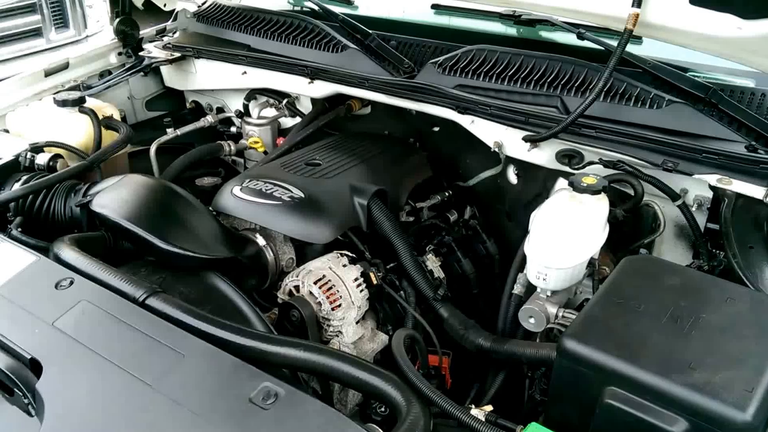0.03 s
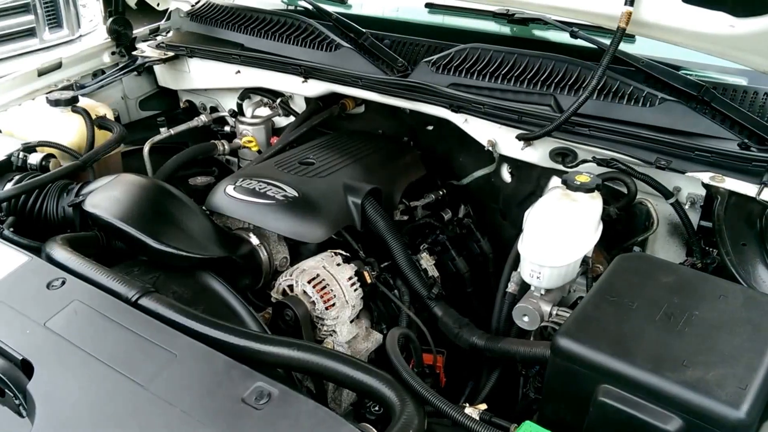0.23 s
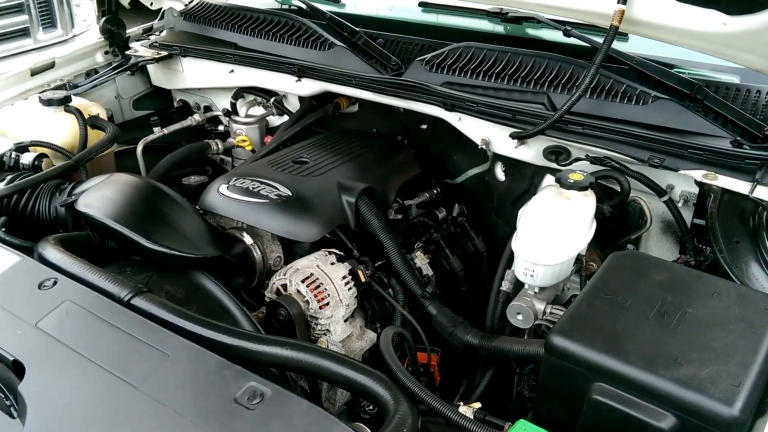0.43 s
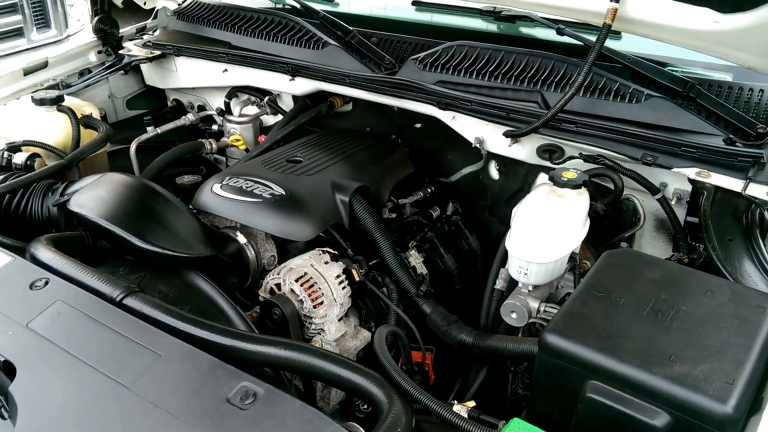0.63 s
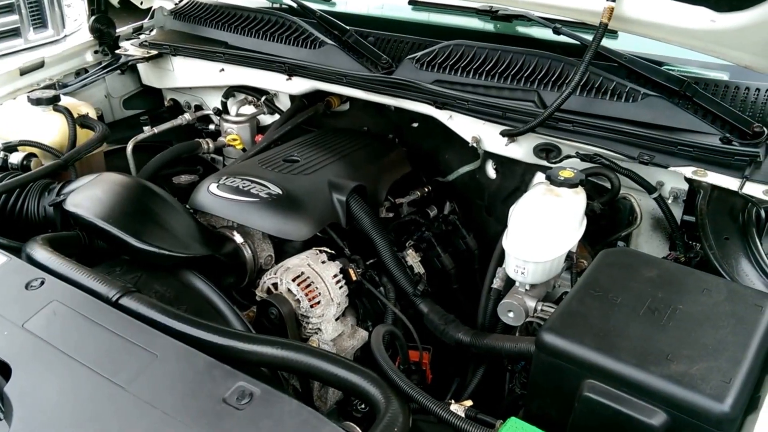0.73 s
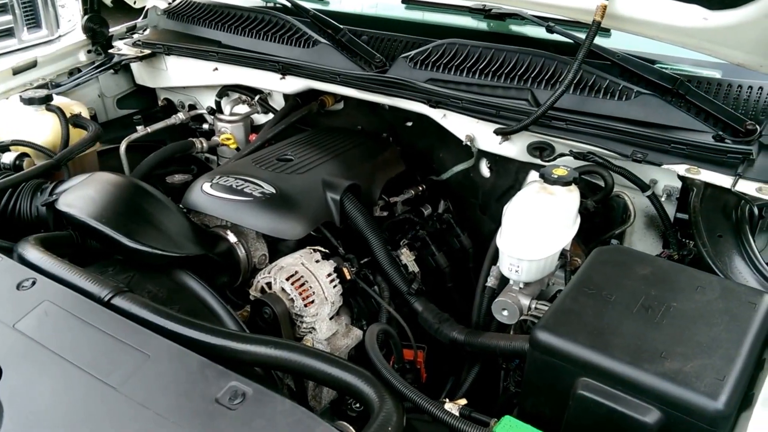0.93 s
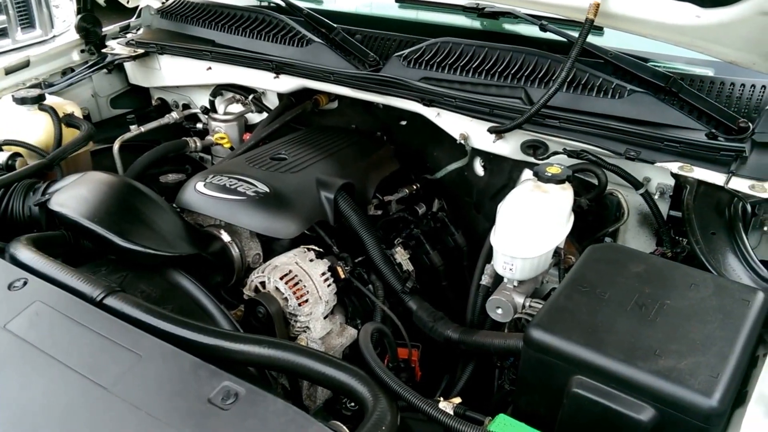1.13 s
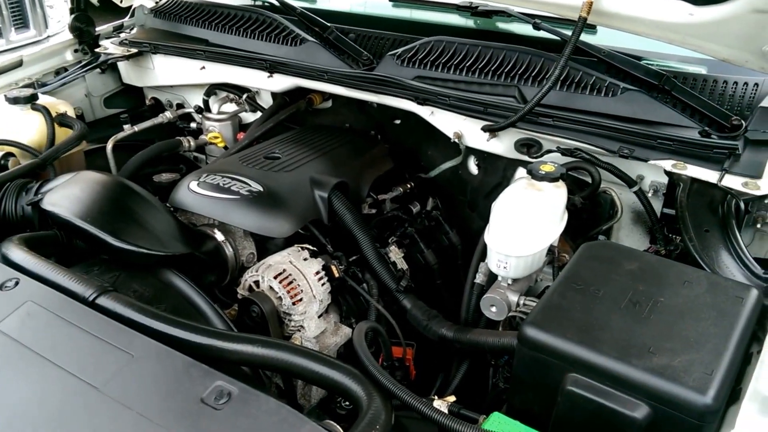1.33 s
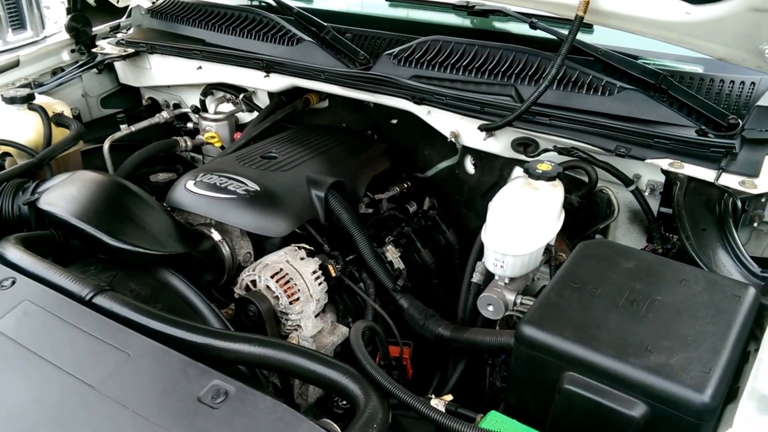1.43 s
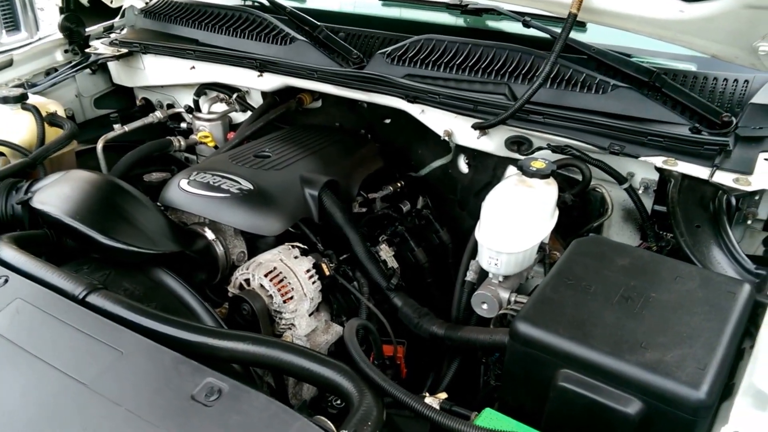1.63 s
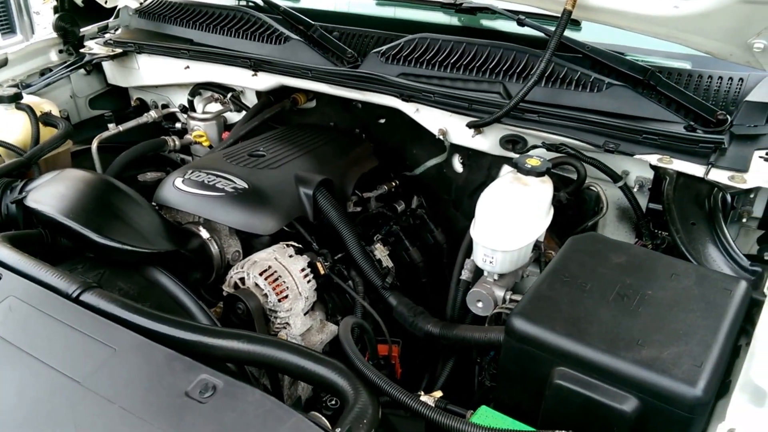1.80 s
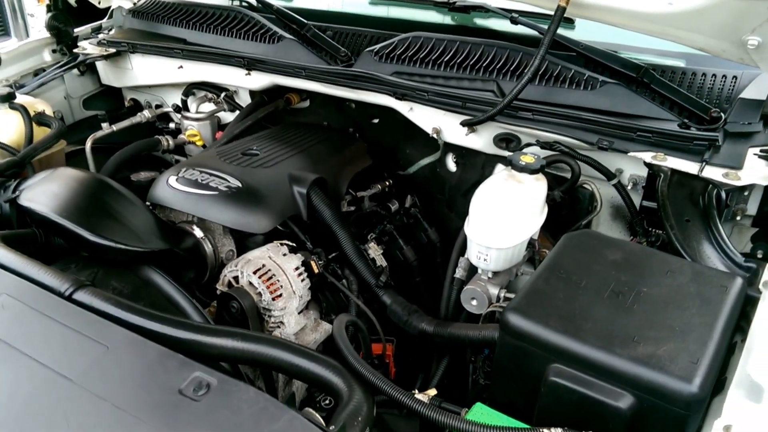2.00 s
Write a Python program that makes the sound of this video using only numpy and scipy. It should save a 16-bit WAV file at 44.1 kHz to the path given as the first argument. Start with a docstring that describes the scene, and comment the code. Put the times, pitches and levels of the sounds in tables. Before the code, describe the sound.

A large petrol engine idles, heard close from above the open bay in stereo. After a moment of silence it fades in by 0.4 s: uneven low throb, boomy fan and intake roar, rapid metallic valve ticking. A thin, wandering whistle comes and goes. Louder knocks stand out from 0.44 s; high belt chirps come near 0.5, 0.9 and 1.3 s. Around 1.6 s the idle sags, then partly recovers.

```python
"""A large petrol V8 idles, heard from above the open engine bay.
After a short silence it fades in: firing-order and fan-blade sines throb under bands of roar and boom noise,
while each firing strikes the ringing modes of the valve covers. A sine whistle, wandering in pitch, soon joins.
From 0.44 s louder knocks, bursts of resonant noise, stand out; from 0.5 s the drive belt chirps three times,
about once per lap, as friction noise in resonances. Near 1.6 s the idle sags, then partly recovers."""
import sys
import numpy as np
from scipy import signal
from scipy.fft import rfft, irfft
from scipy.io import wavfile

SR = 44100
rng = np.random.default_rng(int(sys.argv[2]) if len(sys.argv) > 2 else 0)


def generate_wav(signal):
    """Clip the signal to [-1, 1] and save it as 16-bit WAV at the path in sys.argv[1]."""
    frames = np.transpose(np.atleast_2d(signal))
    scaled = np.clip(frames, -1, 1) * 32767
    pcm = np.round(scaled).astype(np.int16)
    wavfile.write(sys.argv[1], SR, pcm)


N = 90934

# Engine speed. Each row: time in seconds, firing rate in Hz.
FIRING_RATE = [(0, 39.15), (.5, 39.48), (1.4, 39.2), (1.62, 37.48), (1.8, 37.94), (2.06, 38.6)]

# Firing orders. Each row: multiple of firing rate, level in dB re the exhaust note's base, start phase in turns.
FIRING_ORDERS = [(1, -6.5, 0.95), (2, -1.5, 0.75), (5, -7.5, 0.31)]
# Throb of the low notes. Each row: time in seconds, exhaust note base in dB rms, blade tone in dB rms.
LOW_NOTE_THROB = [(0.3, -41, -49), (0.362, -51, -37.5), (0.49, -38, -45.5), (0.618, -60, -39),
                  (0.652, -35, -52), (0.696, -57, -41.5), (0.746, -64, -52), (0.828, -38.5, -35.5),
                  (0.878, -39.5, -44), (0.926, -41, -60), (0.996, -50, -50), (1.034, -60, -35.5),
                  (1.128, -40, -49), (1.182, -46, -47), (1.236, -39, -34.5), (1.314, -37.5, -51),
                  (1.368, -49.5, -37.5), (1.402, -47, -54), (1.51, -37.5, -45), (1.564, -46, -57),
                  (1.598, -54, -43), (1.676, -40, -47), (1.79, -46.5, -47), (1.814, -47, -38.5),
                  (1.946, -37.5, -40), (2.014, -65, -45), (2.06, -55, -63)]
EXHAUST_ORDER, OTHER_ORDERS_THROB_SHARE = 2, .25
BLADES_PER_FIRING, BLADE_START_TURNS, BLADE_OCTAVE_DB = 2.79, 0.914, -14

# Air resonances of the bay. Each row: centre in Hz, width per pass in Hz, level in dB rms before balance.
BAY_RESONANCES = [(27, 8.7, -87), (60, 47, -55), (65.8, 14, -52), (102.8, 29, -49), (202.7, 34, -53.5),
                  (300.8, 30.3, -52), (438, 72, -52.5), (722.5, 135, -51), (1225, 93, -62.5),
                  (1660, 290, -51), (6350, 900, -55.5), (7950, 71, -68)]

# Fan and intake roar. Each row: frequency in Hz, relative spectral density in dB.
ROAR_SPECTRUM = [(74, -19.5), (125, -3), (156, -10), (298, -12), (350, -13), (474, -10.5), (592, -14),
                 (724, -18), (1060, -12), (1350, -13), (1660, -14.5), (3100, -17.5), (6290, -16),
                 (11300, -37), (15600, -34)]
ROAR_RMS_DB, ROAR_FLICKER_DB, ROAR_PULSE_DB, ROAR_PULSE_ABOVE_HZ = -36, 1.18, 1, 1500
# Left-right likeness of the noises. Each row: frequency in Hz, correlation from 0 to 1.
CHANNEL_LIKENESS = [(30, .6), (70, .75), (130, .9), (290, .96), (640, .88), (1100, .7), (1700, .3),
                    (3100, .1), (15000, .05)]
# Balance of the noises. Each row: frequency in Hz, left minus right in dB.
CHANNEL_BALANCE = [(100, -2.5), (450, 1.6), (740, 0), (1220, 5), (2010, 2), (3330, -3.5), (5500, 0.5),
                   (9080, 3), (15000, 2.5)]

# Tick strength by cylinder in firing order. Each entry: level in dB re TICK_DB.
CYLINDER_TICKS = [-2, 0, -3, -1, -3, -2, -4, -1]
# Ringing modes of the valve covers. Each row: frequency in Hz, level in dB, 60 dB decay time in seconds.
COVER_MODES = [(2200, -4, .025), (2750, -2, .03), (3350, -6, .025), (4000, -3, .025), (4750, -1, .03),
               (5300, -3, .025), (6200, -2, .02), (7900, -9, .025)]
TICK_START_S, TICK_DB, TICK_JITTER_S, TICK_SMEAR_S = .0093, -39.5, .0013, .002
TICK_SCATTER_DB, TICK_MODE_SCATTER_DB = 1, 3.5
CLATTER_PER_S, CLATTER_DB, CLATTER_SCATTER_DB = 210, -43, 3.5

# Intake whistle, one list per strand. Each row: time in seconds, pitch in Hz, level in dB rms.
WHISTLE_STRANDS = [
    [(.15, 1070, -39), (.28, 1140, -71), (.4, 1200, -55), (.56, 1215, -44)],
    [(.53, 1060, -53), (.61, 1090, -41), (.72, 1150, -64), (.85, 1225, -50), (.96, 1240, -52)],
    [(.95, 1140, -57), (1.15, 1190, -48.5), (1.3, 1150, -66), (1.45, 1130, -47), (1.62, 1095, -54)],
    [(1.61, 1045, -47), (1.69, 1100, -44), (1.75, 1140, -51), (1.84, 1155, -53), (1.92, 1125, -48),
     (2.02, 1118, -43.5)],
    [(2.01, 1070, -52), (2.09, 1050, -49)],
]
WHISTLE_LEFT_MINUS_RIGHT_DB, WHISTLE_EDGE_S = 3, 0.0067
WHISTLE_WAVER_DB, WHISTLE_WAVER_HZ = 0.5, 6

# Louder knocks. Each row: start in seconds, level in dB rms before the envelope, pitch in Hz.
LOUD_KNOCKS = [(0.441, -33, 2730), (0.65, -31.5, 2700), (0.679, -38, 4700), (.84, -33.5, 2850),
               (1.208, -39, 6240), (1.466, -33, 2800), (1.687, -34, 2400), (1.715, -34, 4850),
               (1.866, -33, 3750), (1.878, -37, 4240)]
KNOCK_RISE_S, KNOCK_T60_S, KNOCK_WIDTH_HZ = 0.0022, 0.048, 260

# Belt slips. Each row: centre in seconds, half length to 1/e in seconds, nominal level in dB, left minus right in dB.
BELT_CHIRPS = [(0.511, 0.019, -37.5, 2), (.916, .012, -28, -1.5), (1.318, 0.0062, -30.5, -2)]
# Resonances of the slipping belt. Each row: centre in Hz, width in Hz, relative gain in dB.
BELT_RESONANCES = [(5470, 230, -12), (5840, 410, -9), (6320, 132, 2), (6970, 280, -6.5), (7740, 560, -14)]
BELT_FLUTTER_DB = 2.7

# Lead of the left channel. Each row: frequency in Hz, phase in radians.
LEFT_LEAD = [(40, 0.1), (100, 0.073), (300, 0.28), (640, 0.55), (1120, 1.06), (1400, 2.77), (2300, 0.11)]
FADE_START_S, FADE_ZERO_S, FADE_END_S, FADE_CURVE = .078, 0.06, 0.37, 1.06
CUTOFF_HZ = 15750


def from_db(db):
    """Decibels to gain."""
    return 10 ** (np.asarray(db) / 20)


def rms_one(x):
    """Scale to unit rms."""
    return x / np.sqrt(np.mean(x ** 2) + 1e-20)


def in_time(rows):
    """Columns of a time table, interpolated to one value per sample."""
    times_s, *columns = np.transpose(rows)
    return [np.interp(np.arange(N) / SR, times_s, column) for column in columns]


def at_hz(points, hz):
    """Read a frequency table on a log frequency axis."""
    points = np.array(points)
    return np.interp(np.log(hz), np.log(points[:, 0]), points[:, 1])


def drift(rate_hz):
    """Slow random wander of unit spread: noise through two equal poles, at 1/40 of the sample rate."""
    step = 40
    r = np.exp(-2 * np.pi * rate_hz * step / SR)
    noise = rng.standard_normal(N // step + 2002)
    slow = signal.lfilter([1], [1, -2 * r, r * r], noise)[2000:]  # settled part
    return np.interp(np.arange(N) / step, np.arange(len(slow)), rms_one(slow - slow.mean()))


def resonate(x, hz, width_hz):
    """Two-pole resonance, gain 1 on top."""
    r = np.exp(-np.pi * width_hz / SR)
    zeros = np.array([1, 0, -1]) * (1 - r * r) / 2
    return signal.lfilter(zeros, [1, -2 * r * np.cos(2 * np.pi * hz / SR), r * r], x)


def stereo(mid, side, hz):
    """Mix two independent noises to the channel likeness and balance at hz."""
    alike = np.clip(at_hz(CHANNEL_LIKENESS, hz), 0, .98)
    signs = np.array([[1], [-1]])
    pair = np.sqrt((1 + alike) / 2) * mid + np.sqrt((1 - alike) / 2) * side * signs
    return pair * from_db(at_hz(CHANNEL_BALANCE, hz) / 2 * signs)


def tones(firings):
    """Firing orders and fan blade tone: sines locked to the firing count, throbbing in level."""
    note_db, blade_db = in_time(LOW_NOTE_THROB)
    calm_db = note_db.mean() + OTHER_ORDERS_THROB_SHARE * (note_db - note_db.mean())
    orders = 0
    for multiple, db, turns in FIRING_ORDERS:
        base_db = note_db if multiple == EXHAUST_ORDER else calm_db
        orders = orders + from_db(db + base_db) * np.cos(2 * np.pi * (multiple * firings + turns))
    phase = 2 * np.pi * (BLADES_PER_FIRING * firings + BLADE_START_TURNS)
    blade = np.cos(phase) + from_db(BLADE_OCTAVE_DB) * np.cos(2 * phase)
    return np.sqrt(2) * (orders + from_db(blade_db) * blade)


def booms():
    """Turbulence excites air resonances of the bay: noise passed twice through each."""
    out = 0
    for hz, width_hz, db in BAY_RESONANCES:
        noise = rng.standard_normal((2, N))
        mid, side = resonate(resonate(noise, hz, width_hz), hz, width_hz)
        out = out + from_db(db) * stereo(rms_one(mid), rms_one(side), hz)
    return out


def roar(firings):
    """Fan and intake noise in flickering third-octave bands, the upper ones pulsing with the firings."""
    out = 0
    edges_hz = 80 * 2 ** np.arange(0, 7.9, 1 / 3)
    together = drift(6)
    white = rng.standard_normal((2, 2, N))
    pulse_db = ROAR_PULSE_DB * np.cos(2 * np.pi * (firings - FIRING_RATE[0][1] * TICK_START_S - .1))
    for k, (low_hz, high_hz) in enumerate(zip(edges_hz, edges_hz[1:])):
        band = signal.butter(2, [low_hz, high_hz], "band", fs=SR, output="sos")
        mid, side = signal.sosfilt(band, white[k % 2])  # neighbours use separate noise
        hz = np.sqrt(low_hz * high_hz)
        flicker_db = ROAR_FLICKER_DB * (0.43 * together + drift(13))
        level_db = at_hz(ROAR_SPECTRUM, hz) + flicker_db + pulse_db * (hz > ROAR_PULSE_ABOVE_HZ)
        out = out + from_db(level_db) * stereo(mid, side, hz)
    return from_db(ROAR_RMS_DB) * rms_one(out)


def valve_gear(firings):
    """One tick per firing, its strength set by cylinder, plus loose clatter, strikes the cover modes."""
    at = np.flatnonzero(np.diff(np.floor(firings - FIRING_RATE[0][1] * TICK_START_S)))
    draws = rng.standard_normal((len(at), 2 + 2 * len(COVER_MODES)))
    cylinder_db = np.take(CYLINDER_TICKS, np.arange(len(at)), mode="wrap")
    tick_db = TICK_DB + cylinder_db + TICK_SCATTER_DB * draws[:, 0]
    at = np.clip(at + (TICK_JITTER_S * SR * draws[:, 1]).astype(int), 0, N - 1)
    out = 0
    for k, (hz, mode_db, t60_s) in enumerate(COVER_MODES):
        loose = rng.random(N) < CLATTER_PER_S / len(COVER_MODES) / SR
        clatter_db = CLATTER_DB + mode_db + CLATTER_SCATTER_DB * rng.standard_normal((2, N))
        clicks = loose * from_db(clatter_db) + 1e-18
        # the parts do not close at quite the same instant; the same draws scatter delay and level
        scatter = draws[:, 2 + 2 * k:4 + 2 * k]
        delay = (TICK_SMEAR_S * SR * np.abs(scatter.sum(axis=1))).astype(int)
        late = np.clip(at + delay, 0, N - 1)
        clicks[:, late] = (-1) ** k * from_db(tick_db + mode_db + TICK_MODE_SCATTER_DB * scatter.T)
        r, w = from_db(-60 / (t60_s * SR)), 2 * np.pi * hz / SR
        strike = np.sin(w) * np.array([0.45, 2.7, 3.53, 1.06]) / 8  # four-sample contact
        out = out + signal.lfilter(strike, [1, -2 * r * np.cos(w), r * r], clicks)
    return out


def whistle():
    """Air squeezing past the throttle: an unsteady sine that breaks off and restarts lower."""
    t, out = np.arange(N) / SR, 0
    for strand in WHISTLE_STRANDS:
        hz, db = in_time(strand)
        edge_distance_s = np.minimum(t - strand[0][0], strand[-1][0] - t)
        gate = np.clip(edge_distance_s / WHISTLE_EDGE_S, 0, 1)
        turns = np.cumsum(hz + WHISTLE_WAVER_HZ * drift(27)) / SR
        level = from_db(db + WHISTLE_WAVER_DB * drift(6.8))
        out = out + gate * level * np.sin(2 * np.pi * turns)
    return np.sqrt(2) * out * from_db(WHISTLE_LEFT_MINUS_RIGHT_DB * np.array([[.5], [-.5]]))


def knocks():
    """Each knock is a short decaying burst of noise in a resonance of its own pitch."""
    out, size = np.zeros((2, N + SR)), SR // 10
    t = np.arange(size) / SR
    for start_s, db, hz in LOUD_KNOCKS:
        noise = rng.standard_normal((2, size))
        burst = rms_one(resonate(resonate(noise, hz, KNOCK_WIDTH_HZ), hz, KNOCK_WIDTH_HZ))
        envelope = from_db(db - 60 * t / KNOCK_T60_S) * (1 - np.exp(-t / KNOCK_RISE_S))
        first = int(start_s * SR)
        out[:, first:first + size] += envelope * burst
    return out[:, :N]


def belt():
    """Each slip is a short swelling burst of friction noise in the belt resonances."""
    t, sides = np.arange(N) / SR, np.array([[.5], [-.5]])
    gate, squeak = 0, 0
    for centre_s, half_s, db, pan_db in BELT_CHIRPS:
        gate = gate + from_db(db + pan_db * sides) * np.exp(-((t - centre_s) / half_s) ** 2)
    noise = rng.standard_normal((2, N))
    for k, (hz, width_hz, db) in enumerate(BELT_RESONANCES):
        squeak = squeak + (-1) ** k * from_db(db) * resonate(noise, hz, width_hz)
    return gate * rms_one(squeak) * from_db(BELT_FLUTTER_DB * drift(60))


def scene():
    """All sources of the engine bay, the tones, pulse and ticks sharing one firing count."""
    rate_hz, = in_time(FIRING_RATE)
    firings = np.cumsum(rate_hz) / SR
    steady = tones(firings) + booms() + roar(firings) + valve_gear(firings)
    return steady + whistle() + knocks() + belt()


def record(dry):
    """Delay the right channel's phase by frequency, fade in from silence, cut the top."""
    t = np.arange(N) / SR
    hz = np.fft.rfftfreq(N, 1 / SR) + 1  # keeps the log finite
    lag = np.exp(-1j * at_hz(LEFT_LEAD, hz) * np.array([[0], [1]]))
    ramp = np.clip((t - FADE_ZERO_S) / (FADE_END_S - FADE_ZERO_S), 0, 1)
    fade = ramp ** FADE_CURVE * (t > FADE_START_S)
    lowpass = signal.ellip(18, .5, 100, CUTOFF_HZ, fs=SR, output="sos")
    return signal.sosfilt(lowpass, irfft(rfft(dry) * lag, N) * fade)


dry = scene()
out = record(dry)
generate_wav(out)
```